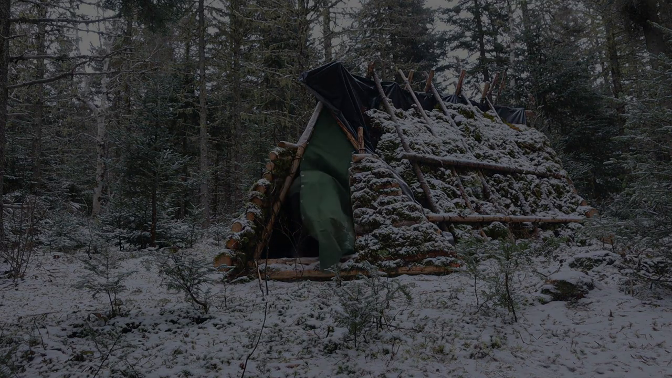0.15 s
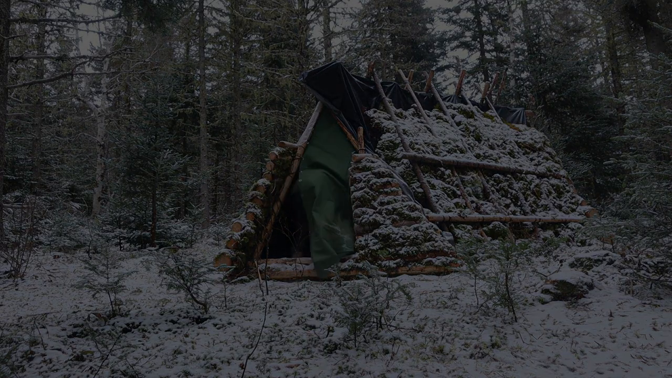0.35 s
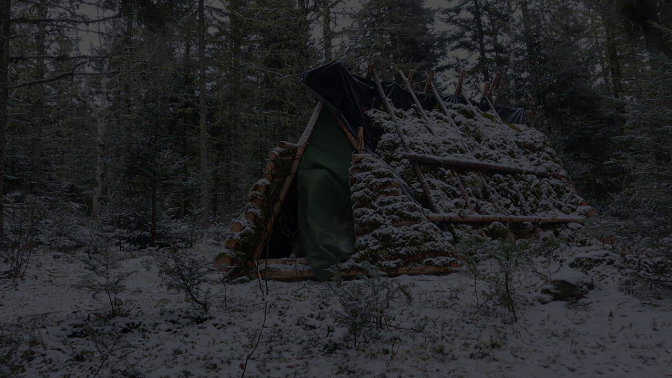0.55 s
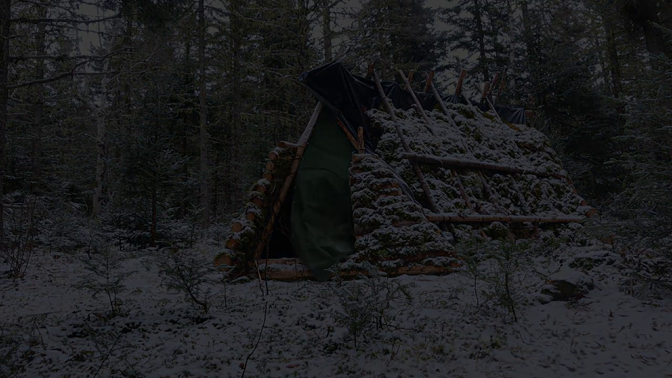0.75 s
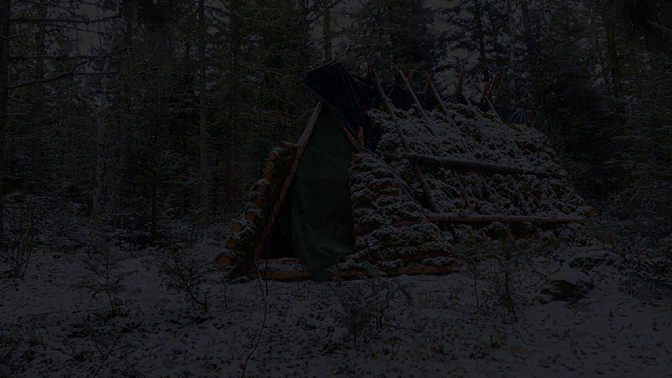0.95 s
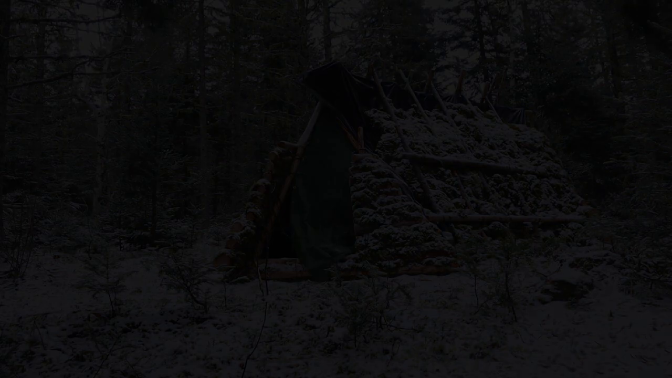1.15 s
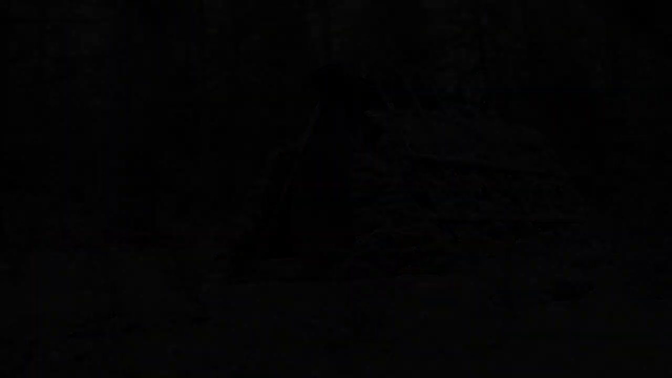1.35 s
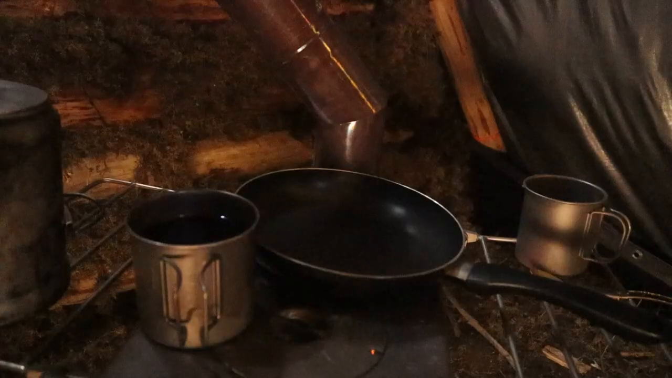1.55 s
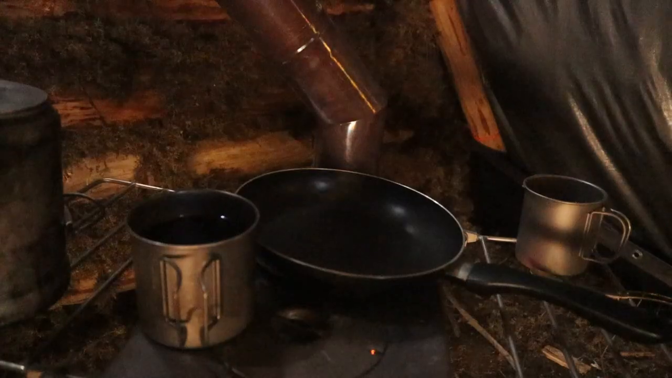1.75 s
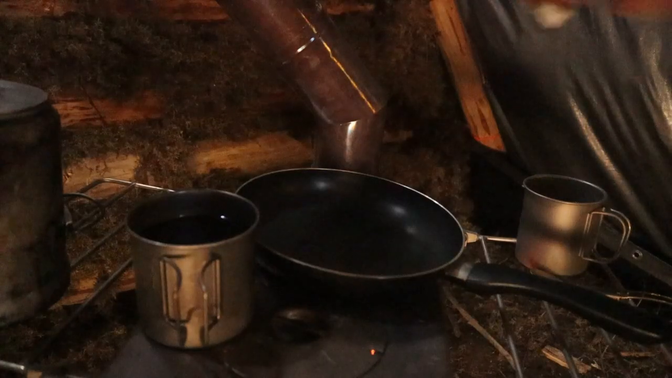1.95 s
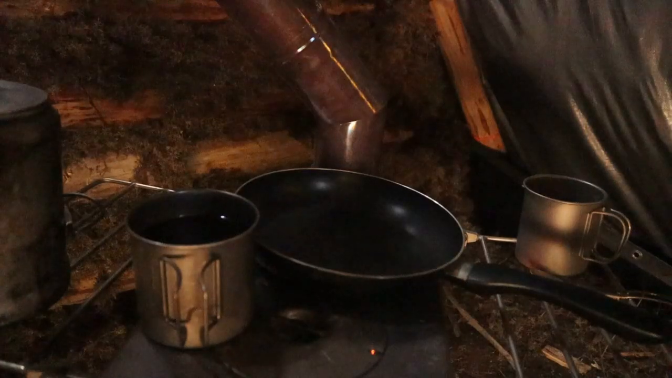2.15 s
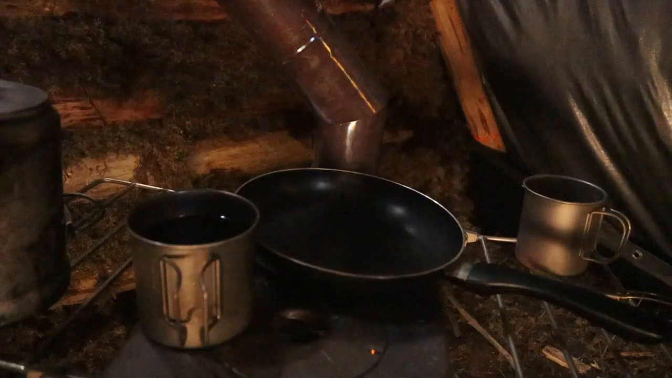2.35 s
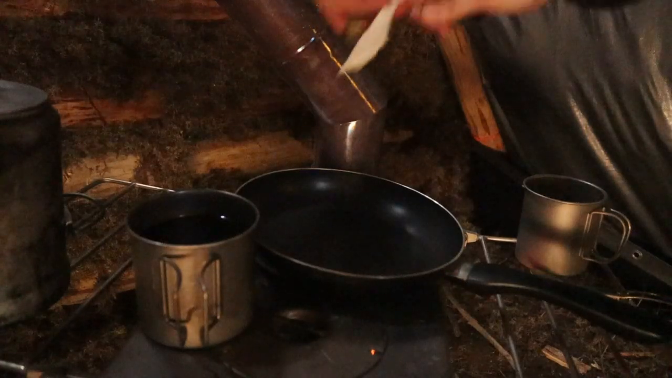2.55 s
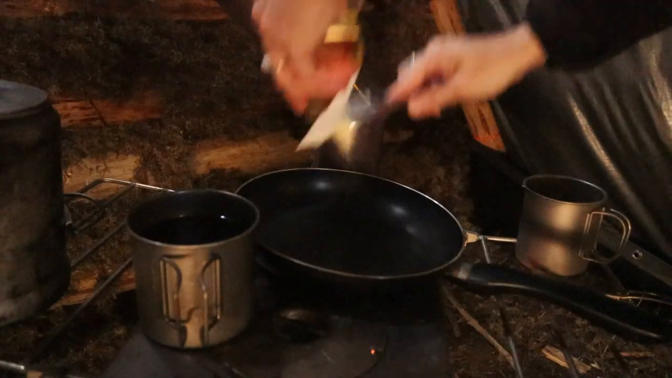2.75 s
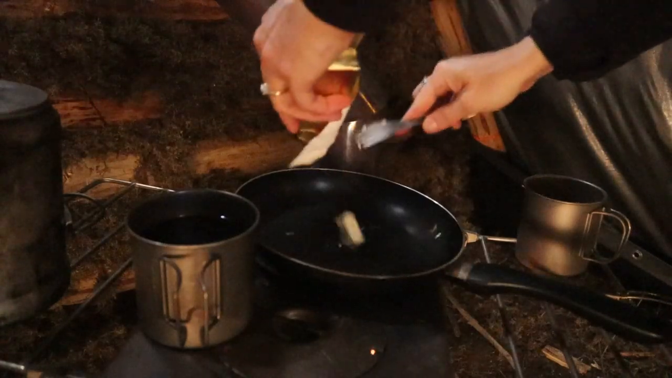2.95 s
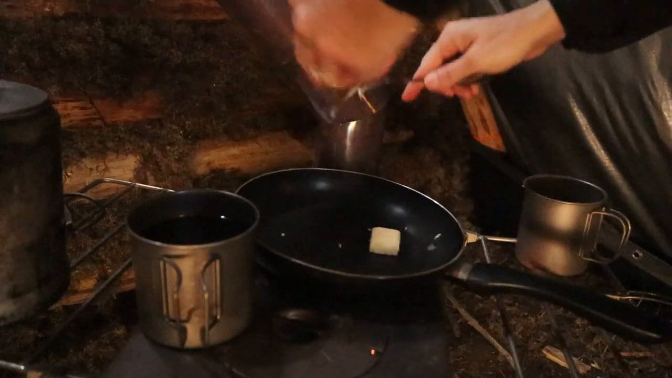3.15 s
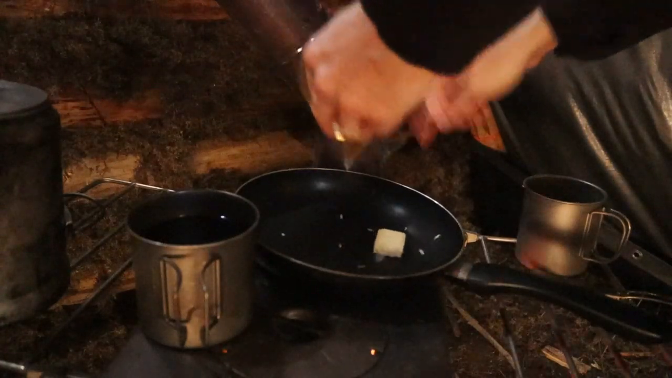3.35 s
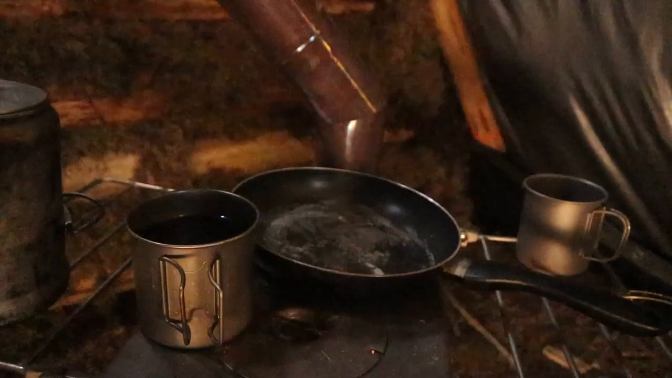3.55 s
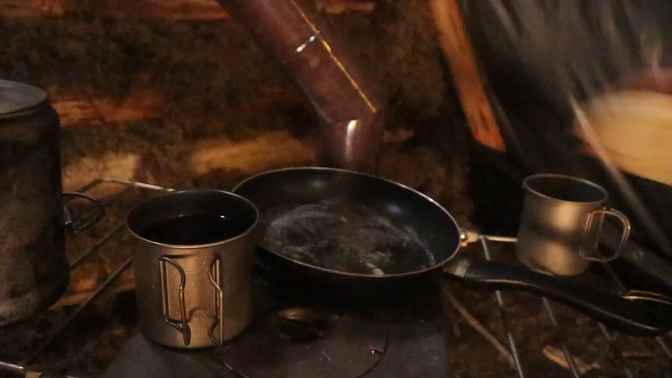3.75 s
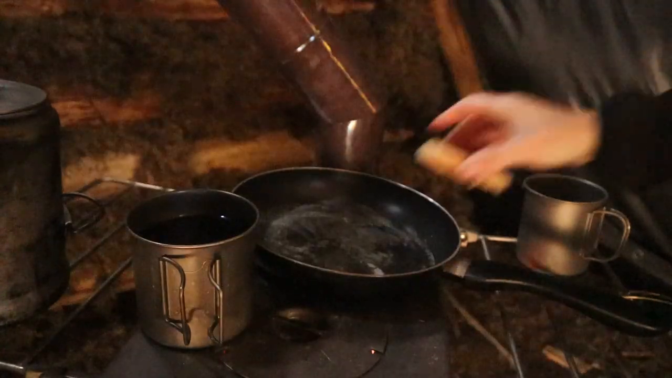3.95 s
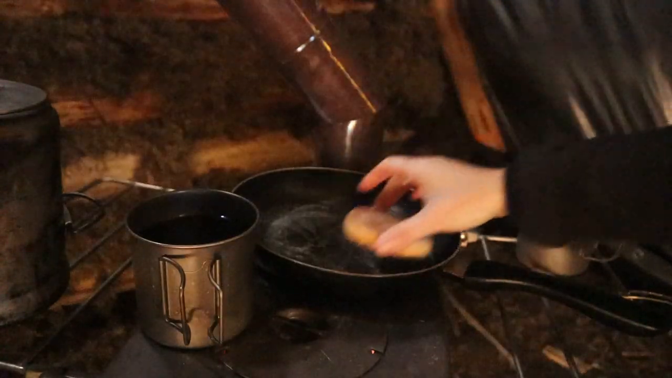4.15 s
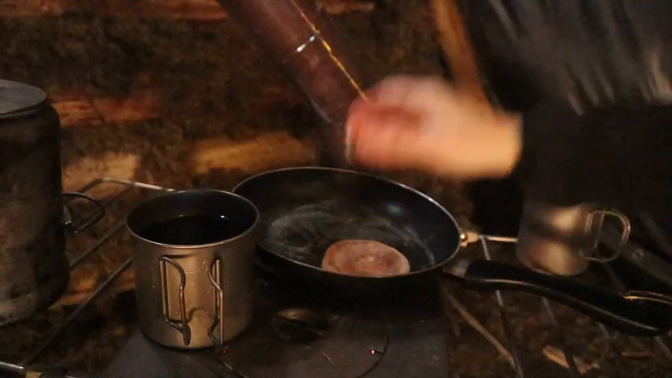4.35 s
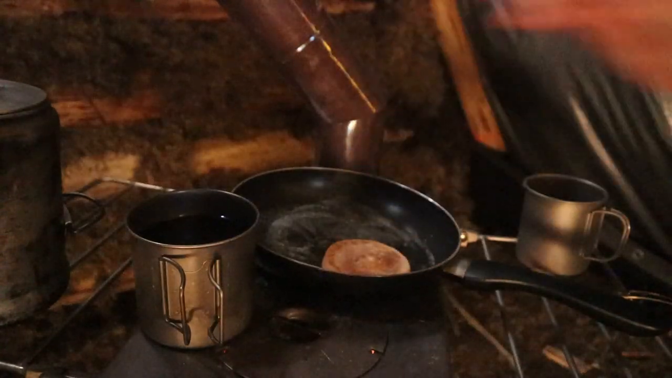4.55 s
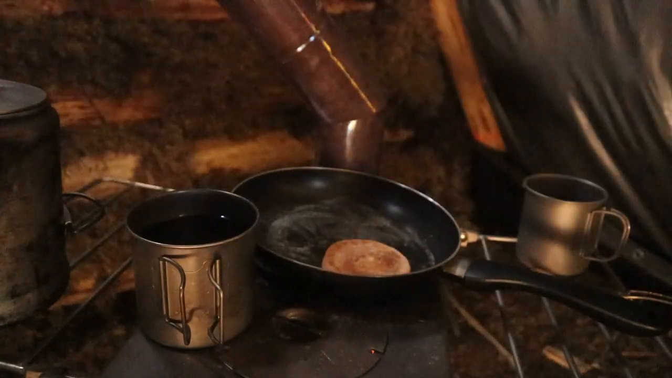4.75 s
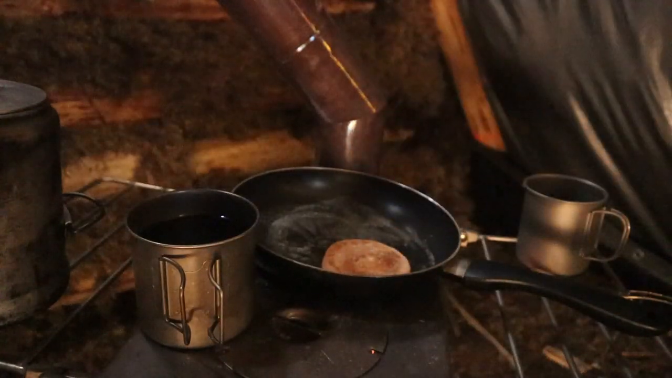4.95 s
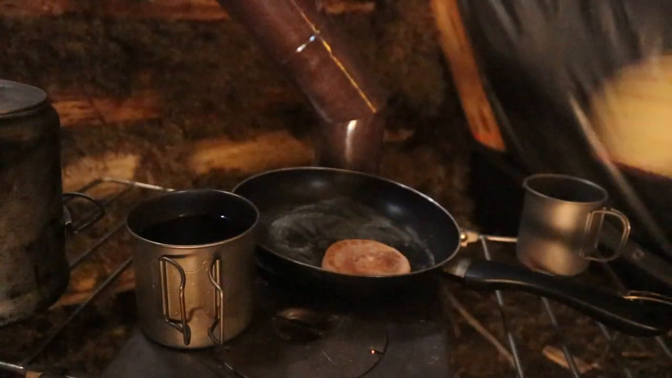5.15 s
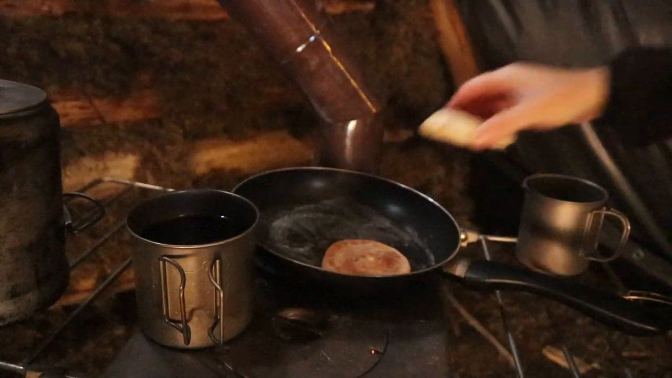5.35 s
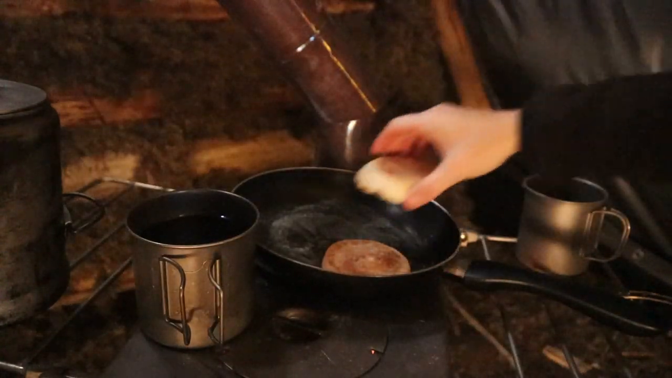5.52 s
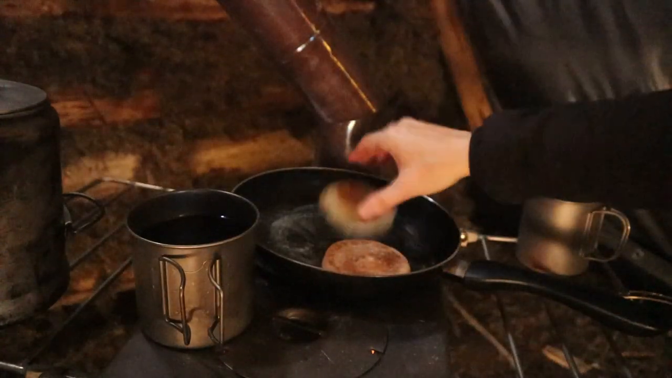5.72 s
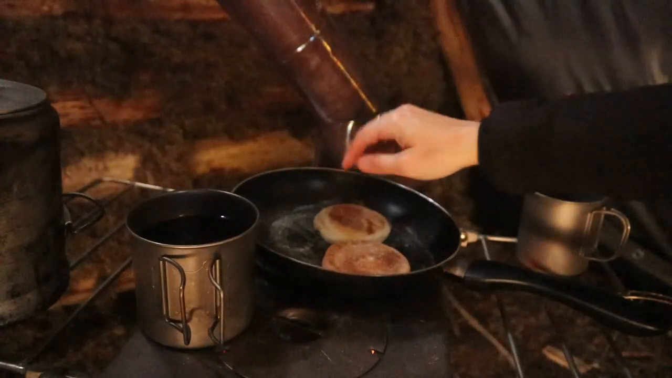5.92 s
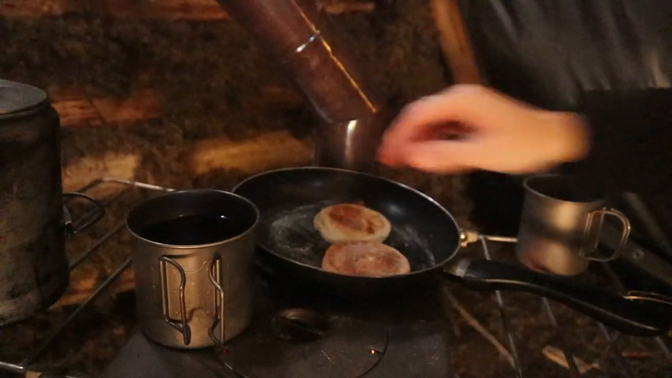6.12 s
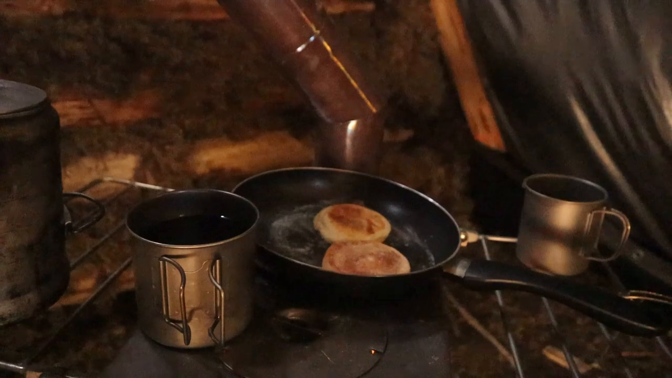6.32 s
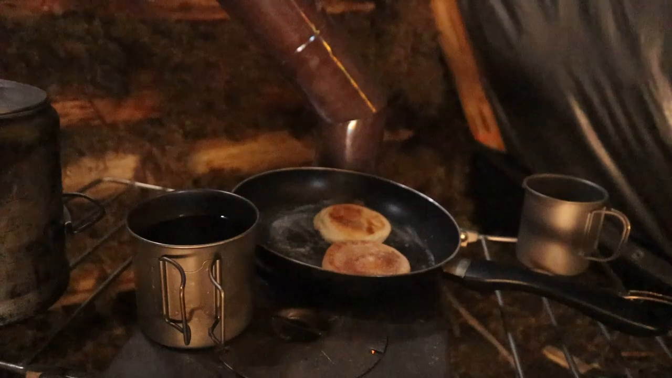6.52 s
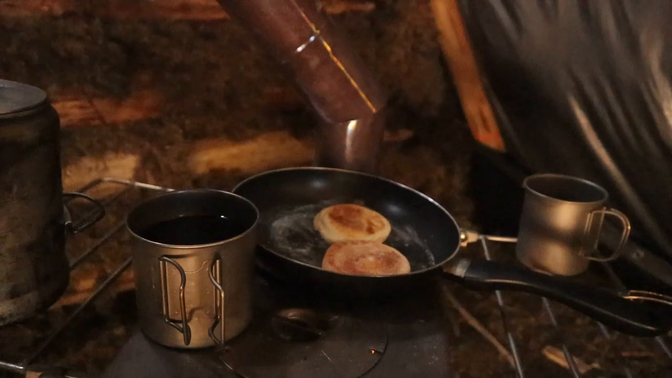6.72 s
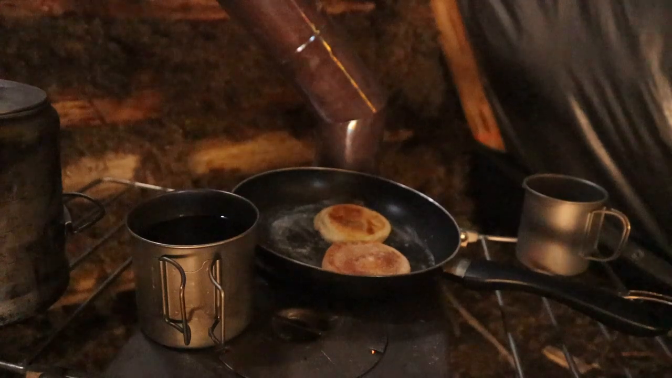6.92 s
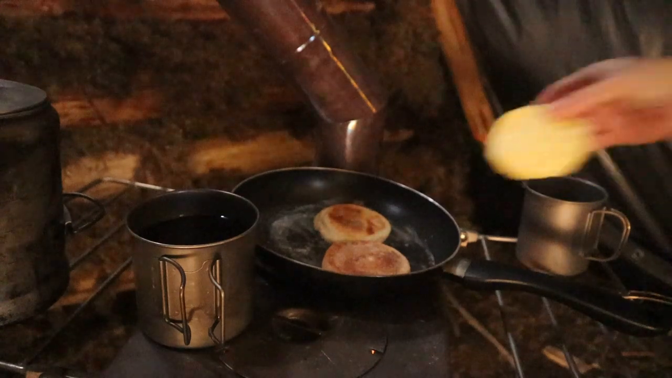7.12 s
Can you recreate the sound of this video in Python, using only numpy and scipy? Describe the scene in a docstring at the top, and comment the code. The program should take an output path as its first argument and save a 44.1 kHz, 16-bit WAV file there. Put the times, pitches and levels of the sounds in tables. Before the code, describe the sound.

Butter splats into a quietly hissing frying pan and two buns land with dull metal knocks, amid wrapper rustling and low thumps.

```python
"""A winter forest, then a log hut with a wood stove. Faint air hisses in the trees and fades; a low
rumble and a few dull thumps run through both places. Indoors, a sleeve and a wrapper rustle by
friction, with small taps, over the hiss of bubbles bursting in a frying pan. A lump of butter drops
in and bounces, then two round buns land. Each impact excites the damped normal modes of the pan and
of the stove top under it, and the log walls reverberate."""
import sys
import numpy as np
from scipy import signal
from scipy.fft import rfft, irfft
from scipy.io import wavfile
from scipy.ndimage import uniform_filter1d

SR = 44100
rng = np.random.default_rng(int(sys.argv[2]) if len(sys.argv) > 2 else 0)


def store_wav(level_fs):
    """Save 16-bit WAV to argv[1]."""
    pcm = np.round(np.clip(np.atleast_2d(level_fs), -1, 1) * 32767)
    wavfile.write(sys.argv[1], SR, pcm.T.astype(np.int16))


N = 316638


def amp(db):
    """Amplitude ratio of a level in decibels."""
    return 10 ** (np.asarray(db) / 20)


def unit(x):
    """Normalisation to rms 1."""
    return x / np.sqrt(np.mean(x ** 2) + 1e-20)


def curve_at(points, hz):
    """Interpolation on a logarithmic frequency axis."""
    f, value = np.transpose(points)
    return np.interp(np.log(hz + 1), np.log(f + 1), value)


def add(mix, start_s, sound):
    """Superposition: a sound adds to the mix from start_s on."""
    part = mix[max(round(start_s * SR), 0):][:len(sound)]
    part += sound[:len(part)]


def colour(x, curve_db):
    """Spectral shaping by a gain in dB that depends on frequency; rms 1."""
    hz = np.fft.rfftfreq(len(x), 1 / SR)
    return unit(irfft(rfft(x) * amp(curve_db(hz)), len(x)))


def rolloff(ratio, order):
    """Butterworth response in dB: flat below ratio 1, falling 6 dB an octave per order above."""
    return -10 * np.log10(1 + ratio ** (2 * order))


def resonance(hz, centre_hz, octaves):
    """A broad resonance in dB, symmetric in log frequency."""
    return 2 * rolloff(np.log2((hz + 1) / centre_hz) / octaves, 1)


def highpass(x, hz):
    """Second-order attenuation of the bass below hz."""
    return signal.sosfilt(signal.butter(2, hz, "highpass", fs=SR, output="sos"), x)


def grainy(grains_per_s, grain_db):
    """Gaussian hiss plus shot noise: sparse clicks of uneven size."""
    sizes = np.clip(rng.standard_normal(N) * rng.exponential(1, N), -3, 3)
    clicks = sizes * (rng.random(N) < grains_per_s / SR)
    return rng.standard_normal(N) + amp(grain_db) * unit(clicks)


def patchy(x, depth_db):
    """Random modulation: patches of the spectrum, some 400 Hz by 50 ms, swell and sink."""
    spectra = signal.stft(x, nperseg=512)[2]
    field = uniform_filter1d(rng.standard_normal(spectra.shape), size=5, axis=0)
    field = unit(uniform_filter1d(field, size=8, axis=1))
    return unit(signal.istft(spectra * amp(depth_db * field), nperseg=512)[1][:N])


def decay(t, t60, rise_s):
    """Exponential damping, 60 dB in t60 seconds, after a smooth onset."""
    return (1 - np.exp(-t / rise_s)) * amp(-60 * t / t60)


def burst(curve_db, t60):
    """Many tiny contacts at once sum to a decaying puff of coloured noise."""
    t = np.arange(SR // 4) / SR
    return colour(rng.standard_normal(len(t)), curve_db) * decay(t, t60, rise_s=0.00027)


# spectrum of air in the trees: f/Hz, relative level/dB
AIR_SPECTRUM = [(59, -36), (100, -9), (254, -4), (328, -8), (471, -7), (523, -11.5), (620, -2.5),
                (1360, -0.5), (2260, -8), (3310, -5), (3930, -11.5), (8250, -12), (10200, -22.5),
                (13400, -17), (15900, -30)]


def forest_air(air_db=-40, far_db=-59, swell_s=0.095, hold_until_s=0.22, fade_db_per_s=14.5):
    """Broadband noise of air in the trees swells, holds and decays exponentially into a far hiss."""
    t = np.arange(N) / SR
    hiss = colour(grainy(900, -15), lambda hz: curve_at(AIR_SPECTRUM, hz))
    hiss = patchy(hiss, depth_db=1.54)
    far = colour(rng.standard_normal(N), lambda hz: rolloff(hz / 8000, 1))
    swell_db = -5.5 * np.maximum(1 - t / swell_s, 0)
    fade_db = -fade_db_per_s * np.maximum(t - hold_until_s, 0)
    return hiss * amp(air_db + swell_db + fade_db) + amp(far_db) * far


# envelope of the rumble: t/s, level/dB
RUMBLE_ENVELOPE = [(0, -62.5), (1.4, -57), (1.65, -56), (2.1, -58.5), (4.1, -61), (5.2, -68.5),
                   (6.7, -64.5), (7.1, -62)]


def air_rumble(centre_hz=75, octaves=1.8, lumps_db=3, lumps_per_s=12):
    """Moving air gives low-frequency noise, made lumpy by random amplitude modulation."""
    t = np.arange(N) / SR
    low = colour(rng.standard_normal(N),
                 lambda hz: resonance(hz, centre_hz, octaves) + 2 * rolloff(hz / 500, 1))
    lumps = np.interp(t * lumps_per_s, np.arange(128), rng.standard_normal(128))
    level_db = np.interp(t, *np.transpose(RUMBLE_ENVELOPE))
    return amp(level_db) * unit(low * amp(lumps_db * lumps))


# dull thumps: t/s, bump level/dB, bump f/Hz, boom level/dB, boom f/Hz, boom T60/s,
# slap level/dB, slap f/Hz
DULL_THUMPS = [(.039, -24, 179, -34.5, 75, 0.36, -39, 220), (0.453, -35, 185, -60, 80, .1, -50, 300),
               (.785, -44, 159, -60, 80, .1, -60, 200), (.895, -36, 251, -53, 89.5, .3, -43, 220),
               (1.171, -29.5, 150, -48, 65, .3, -36.5, 380), (1.185, -29, 165, -38, 58, 0.82, -56, 200),
               (2.063, -20.5, 196, -36, 52, 0.73, -20, 766), (3.599, -40, 131, -60, 70, 0.17, -60, 200),
               (3.66, -41, 120, -60, 70, .15, -62, 200), (3.795, -42, 135, -50.5, 70, 0.17, -56, 195),
               (7.135, -43.5, 150, -48, 75, 0.27, -60.5, 199)]


def thumps(sag=0.45, sag_s=0.03, slap_octaves=1.56, roughness=0.57):
    """Damped oscillations: a short bump and a deep, uneven boom of falling pitch, with a noisy slap."""
    out, t = np.zeros(N), np.arange(SR) / SR
    for start, bump_db, bump_hz, boom_db, boom_hz, boom_t60, slap_db, slap_hz in DULL_THUMPS:
        bump = np.sin(2 * np.pi * bump_hz * t) * decay(t, t60=0.058, rise_s=0.0019)
        waver = 1 + roughness * colour(rng.standard_normal(SR), lambda hz: rolloff(hz / 30, 2))
        cycles = np.cumsum(boom_hz * (1 + sag * np.exp(-t / sag_s))) / SR
        boom = waver * np.sin(2 * np.pi * cycles) * decay(t, boom_t60, rise_s=0.014)
        slap = burst(lambda hz: resonance(hz, slap_hz, slap_octaves) + 2 * rolloff(hz / slap_hz / 5, 1),
                     t60=0.044)
        add(out, start, amp(bump_db) * bump + amp(boom_db) * boom)
        add(out, start, amp(slap_db) * slap)
    return out


def stroke_speed(start, rise_s, fall_s):
    """Speed of the hand, 0 to 1: a power-law rise, then a nearly Gaussian fall to rest."""
    t = np.arange(N) / SR - start
    speeding_up = np.clip(t / rise_s, 0, 1) ** 0.66
    slowing_down = np.exp(-(np.maximum(t - rise_s, 0) / fall_s) ** 2.1)
    return speeding_up * slowing_down


# strokes of sleeve and wrapper: t/s, rise/s, fall/s, hiss level/dB, fold level/dB relative to the hiss
HAND_STROKES = [(1.47, 0.036, .17, -39.5, -2), (1.56, 0.039, 0.26, -44, 3), (1.791, 0.083, 0.081, -42.5, 0),
                (1.88, .15, 0.42, -46, 1.5), (2.16, .11, 0.1, -41.5, -2), (2.31, .19, 0.082, -38.5, 0.5),
                (2.51, 0.047, 0.1, -38, -2), (2.639, 0.064, 0.15, -43, 1.5), (3.18, 0.19, 0.058, -50, 2.5),
                (3.62, .5, .12, -50, -0.5), (4.45, .22, .4, -56.5, 3), (5.06, 0.04, 0.32, -51.5, -2),
                (5.22, .17, 0.1, -44, 0), (5.48, 0.23, .09, -42, -3), (5.94, 0.25, 0.29, -52, -2.5),
                (6.439, 0.15, 0.051, -47, 0), (6.62, 0.65, .2, -57.5, -1)]
# spectrum of the rustle: f/Hz, relative level/dB
RUSTLE_SPECTRUM = [(88, -38), (150, -9.5), (230, -3.5), (303, -6), (448, -0.5), (661, -1.5), (715, 0),
                   (958, -1.5), (2180, -5.5), (5240, -10), (6240, -8.5), (12600, -18.5), (15900, -23.5)]


def rustle(split_hz=2000, rest_db=-66):
    """Friction noise follows speed: sliding fibres hiss, folds flap lower and more coarsely."""
    hiss_power = fold_power = amp(rest_db) ** 2
    for start, rise_s, fall_s, hiss_db, folds_db in HAND_STROKES:
        power = (amp(hiss_db) * stroke_speed(start, rise_s, fall_s)) ** 2
        hiss_power = hiss_power + power  # incoherent sources add in power
        fold_power = fold_power + power * amp(folds_db) ** 2
    hiss = colour(grainy(2500, -7.5),
                  lambda hz: curve_at(RUSTLE_SPECTRUM, hz) + rolloff(split_hz / (hz + 1), 3))
    folds = colour(grainy(500, -8), lambda hz: curve_at(RUSTLE_SPECTRUM, hz) + rolloff(hz / split_hz, 3))
    sliding = patchy(hiss, depth_db=1.8) * np.sqrt(hiss_power)
    flapping = patchy(folds, depth_db=0.5) * np.sqrt(fold_power)
    return sliding + flapping


# spectrum of frying and stove draught: f/Hz, relative level/dB
FRYING_SPECTRUM = [(15, -29.5), (25, -3), (117, -4.5), (153, -16.5), (195, -13), (308, -9.5), (383, -9.5),
                   (475, -21), (529, -8.5), (816, -16), (1220, -13.5), (2470, -20), (3420, -18),
                   (6530, -18.5), (15900, -24)]


def frying(level_db=-55):
    """Tiny bubbles burst at random and sum to steady noise over the low draught of the stove."""
    sizzle = colour(grainy(500, -13.5), lambda hz: curve_at(FRYING_SPECTRUM, hz))
    return amp(level_db) * patchy(sizzle, depth_db=1.3)


# taps and crinkles of knife, wrapper and sleeve: t/s, level/dB, centre f/Hz, half-width/octaves, T60/s
SMALL_CONTACTS = [(1.755, -27, 1030, 1.14, 0.022), (1.81, -31.5, 2700, 1.1, 0.21),
                  (1.882, -34, 2580, 0.67, 0.066), (1.985, -30.5, 2580, 1.5, 0.11),
                  (2.369, -26, 1010, 0.47, 0.036), (2.394, -27.5, 2770, 1.8, 0.077),
                  (2.702, -30, 1170, 0.51, 0.037), (2.74, -27, 1470, 0.37, 0.023),
                  (2.757, -28, 1290, 0.31, .035), (2.779, -29, 1300, 0.3, .035),
                  (3.231, -42.5, 13150, 0.51, 0.035), (3.245, -34.5, 700, 1, 0.022),
                  (3.251, -29, 700, 0.31, 0.032), (3.308, -32, 1220, 0.91, 0.052),
                  (3.35, -39.5, 694, 0.42, 0.096), (3.399, -30, 2100, 0.71, 0.017),
                  (3.4034, -26.5, 3500, 1.5, 0.043), (4.152, -42, 695, 0.53, 0.042),
                  (5.422, -32.5, 596, 0.91, 0.048), (5.4505, -30, 3000, 2.7, 0.038),
                  (6.612, -36.5, 597, 0.57, 0.048), (6.972, -46, 6900, 1.4, 0.06)]


def taps(top_hz=9000):
    """Each small, dry contact excites one broad, heavily damped resonance."""
    out = np.zeros(N)
    for start, db, centre_hz, octaves, t60 in SMALL_CONTACTS:
        tap = burst(lambda hz: resonance(hz, centre_hz, octaves) + rolloff(hz / top_hz, 2), t60)
        add(out, start, amp(db) * tap)
    return out


def ring(modes, contact_s, rise_s, order, alternate):
    """Free vibration after a blow: a long contact excites high modes weakly, more so in heavy metal."""
    t = np.arange(SR) / SR
    hz, db, t60 = np.transpose(modes)[:, :, None]
    excitation = amp(db) / np.hypot(1, hz * contact_s) ** order
    partials = excitation * np.cos(2 * np.pi * hz * t) * decay(t, t60, rise_s)
    if alternate:  # away from the struck spot, neighbouring modes of a plate swing in antiphase
        partials *= (-1.) ** np.arange(len(hz))[:, None]
    return partials.sum(0)


# normal modes of the frying pan: f/Hz, relative level/dB, T60/s
PAN_MODES = [(168, -36.5, .6), (271.3, -32, .4), (304, -34.5, .5), (343, -22.5, 0.092), (549, -40.5, 0.42),
             (812, -23, .2), (877, -.5, .078), (894, -24, 0.21), (1020, -27, .25), (1117, -14.5, .05),
             (1150, -14.5, .15), (1486, -14, .07), (1502, -23.5, 0.092), (1820, -29.5, .06),
             (2300, -23, .07), (2720, -26.5, 0.039), (3040, -24.5, .07), (3340, -26, 0.047),
             (3610, -22, 0.055), (3885, -25.5, .05), (4330, -25, .075), (5500, -31, .05),
             (6675, -30.5, .05), (6895, -31, .07), (7500, -23, .04), (8140, -20.5, 0.05)]
# normal modes of the stove top loaded by the pan: f/Hz, relative level/dB, T60/s
STOVE_MODES = [(84.6, -42.5, 1.2), (173, -33.5, 0.72), (204, -13, .07), (226.4, -33, 1), (257.6, -32, .65),
               (286.4, -27, 0.37), (350, -1.5, .036), (623, 7.5, .022), (399, -32, .37), (702, -34, .3),
               (836, -30, 0.18), (930, -12.5, .02), (1125, -13.5, .05), (1313, -28, 0.068),
               (1580, -22, .04)]


def pan_on_stove(impacts, contact_spectrum):
    """Impact excitation: pan and stove top ring together, while the food adds contact noise."""
    out = np.zeros(N)
    for start, pan_db, stove_db, contact_s, noise_db, noise_t60 in impacts:
        pan = ring(PAN_MODES, contact_s, rise_s=0.0004, order=1, alternate=False)
        stove = ring(STOVE_MODES, contact_s, rise_s=0.00094, order=2, alternate=True)
        noise = burst(lambda hz: curve_at(contact_spectrum, hz), noise_t60)
        add(out, start, amp(pan_db) * highpass(pan, hz=170))  # thin metal radiates little bass
        add(out, start, amp(stove_db) * highpass(stove, hz=60))
        add(out, start, amp(noise_db) * highpass(noise, hz=140))
    return out


# impacts of the butter: t/s, pan gain/dB, stove gain/dB, contact time/s, splat level/dB, splat T60/s
BUTTER_IMPACTS = [(2.9075, 2.5, -24.5, 0.00027, -11.5, 0.04), (2.9167, -36, -38.5, 0.000056, -14.5, 0.045),
                  (2.935, -48, -35, .0005, -31.5, .3), (3.0648, -18, -50, 0.00003, -33, 0.025),
                  (3.0665, -14, -31, 0.0005, -39, .04), (3.0738, -6, -51, 0.00076, -45, 0.14),
                  (3.1035, -43, -55, .0001, -31, 0.012)]
# spectrum of the wet splat: f/Hz, relative level/dB
SPLAT_SPECTRUM = [(40, -10), (300, 6), (600, -3), (1500, 1), (3300, -1.5), (5000, -15), (8000, -6.5),
                  (10000, -22.5), (16000, -30)]


def butter():
    """Inelastic impact: the lump strikes the pan with a wet splat and bounces more weakly."""
    return pan_on_stove(BUTTER_IMPACTS, SPLAT_SPECTRUM)


# reverberation time of the hut: f/Hz, T60/s
HUT_DECAY = [(100, 3.4), (260, 0.94), (700, 0.21), (1800, 0.17), (5000, 0.27), (12000, 0.01)]
# strength of the hut's reflections: f/Hz, level/dB
HUT_REFLECTIONS = [(80, -19.5), (160, -13), (270, -10), (450, -20), (700, -23.5), (900, -16), (1200, -10.5),
                   (4000, -11.5), (12000, -18.5)]


def hut_reverberation(x, build_up_s=0.0034):
    """Dense reflections from the log walls decay exponentially; the bass lasts longest."""
    hz, t, spectra = signal.stft(rng.choice([-1., 1.], SR), SR, nperseg=256)
    t60 = curve_at(HUT_DECAY, hz)[:, None]
    level_db = curve_at(HUT_REFLECTIONS, hz)[:, None]
    equal_energy = np.sqrt(2 * np.log(1000) / (t60 * SR))  # a longer decay adds no energy
    spectra *= amp(level_db - 60 * t / t60) * equal_energy
    tail = signal.istft(spectra, SR, nperseg=256)[1]
    tail *= 1 - np.exp(-(np.arange(len(tail)) / SR / build_up_s) ** 2)
    return signal.fftconvolve(x, tail)[:N]


# impacts of the buns: t/s, pan gain/dB, stove gain/dB, contact time/s, scuff level/dB, scuff T60/s
BUN_IMPACTS = [(4.2755, -60, -27.5, 0.0023, -46, 0.034), (4.2898, -24, 0.5, 0.0033, -16, 0.061),
               (4.2969, -21, -16, .002, -24, 0.11), (4.3176, -37, -34, 0.0012, -24.5, 0.097),
               (4.3246, -22, -30, .0003, -29, 0.059), (4.345, -25, -30, 0.0017, -44.5, 0.27),
               (5.7975, -34, -30, .00015, -23.5, 0.046), (5.8055, -24, -7, .0001, -14.5, .02)]
# spectrum of the scuffing crust: f/Hz, relative level/dB
SCUFF_SPECTRUM = [(60, -14), (300, 4), (700, -0.5), (1200, 3), (1600, -2.5), (2500, -9), (3600, -9.5),
                  (5500, -19.5), (8500, -17), (10500, -30), (16000, -29)]


def buns():
    """Momentum transfer: two buns land with a scuff of crust and knock the pan on the stove top."""
    return pan_on_stove(BUN_IMPACTS, SCUFF_SPECTRUM)


def scene(indoors_s=1.511, crossfade_s=0.0071, dip_db=-24):
    """The sources superpose; the forest gives way to the hut, whose level dips once for an instant."""
    t = np.arange(N) / SR
    indoors = np.clip((t - indoors_s) / crossfade_s, 0, 1)
    impacts = butter() + buns()
    hut = rustle() + frying() + taps() + impacts + hut_reverberation(impacts)
    dip = amp(dip_db * ((t > 3.432) & (t < 3.4445)))
    mix = (1 - indoors) * forest_air() + air_rumble() + thumps() + indoors * hut * dip
    return highpass(mix, hz=29)[None]


def record(dry, edge_hz=15950):
    """Saturation clips the hardest blow; a low-pass filter then limits the bandwidth."""
    clipped = np.clip(dry, -1, 1)
    lowpass = signal.firwin(511, edge_hz, window=("kaiser", 9), fs=SR)
    return signal.oaconvolve(clipped, lowpass[None], "same")


dry = scene()
out = record(dry)
store_wav(out)
```